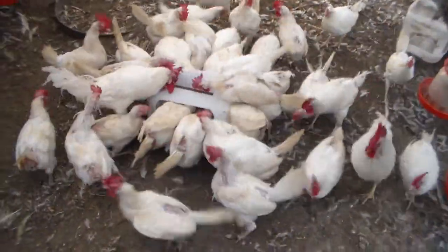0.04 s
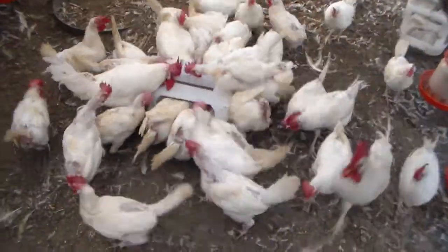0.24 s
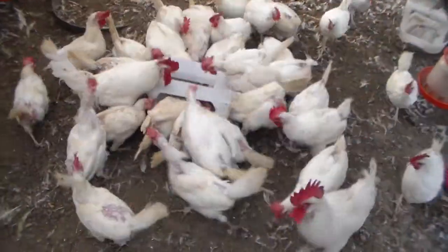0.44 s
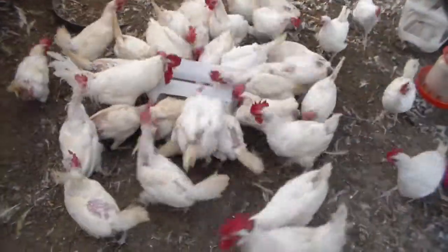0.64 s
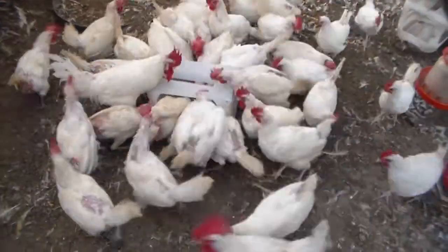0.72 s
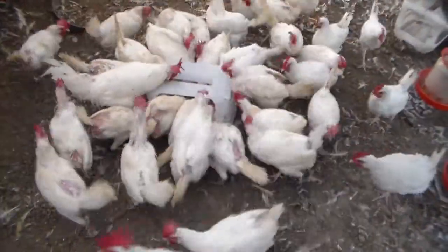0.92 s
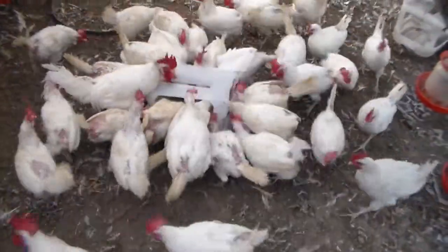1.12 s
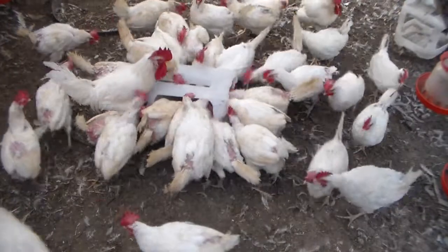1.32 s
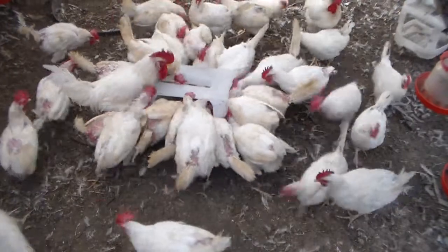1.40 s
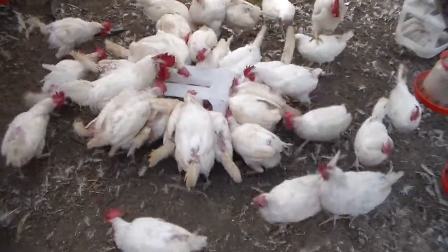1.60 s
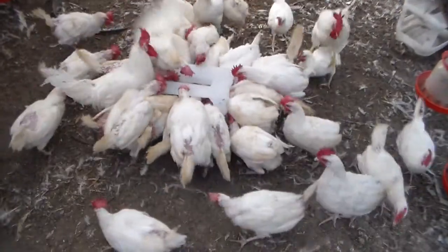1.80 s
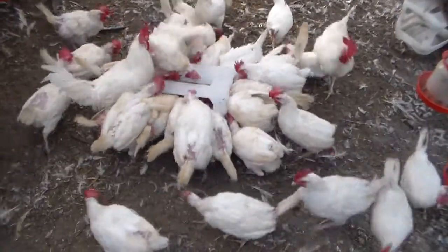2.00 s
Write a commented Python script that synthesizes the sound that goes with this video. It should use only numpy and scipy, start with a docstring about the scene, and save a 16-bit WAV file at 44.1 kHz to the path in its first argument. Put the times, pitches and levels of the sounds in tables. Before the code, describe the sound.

Hens call close up around a plastic feeder. A harsh, breathy squawk dies by 0.08 s, with short clucks to 0.3. Rough, wavering drawls overlap from 0.5 to 0.95, then scattered clucks until 1.5. A sharp call drops at 1.56; another drawl runs from 1.72, with high chirps at 1.8-1.95. Irregular beak ticks, soft wing thumps and swishes, litter rustle, distant flock murmur and low rumble continue throughout.

```python
"""Several hens squawk, drawl, chirp and cluck over one another, heard close up at a plastic feeder.
Their calls are stacks of wavering partials; one harsh squawk is pulses and breath through a throat.
Beaks tick on the ringing plastic; bodies and wings bump and brush as thumps, swishes and feather hiss.
Feet rustle in the litter as grains on noise; behind lie a farther flock, low yard rumble and wall echoes.
Two close microphones hear it, alike in the bass and unrelated in the treble."""
import sys
import numpy as np
from scipy import signal
from scipy.fft import rfft, irfft
from scipy.io import wavfile

SR = 44100
rng = np.random.default_rng(int(sys.argv[2]) if len(sys.argv) > 2 else 0)


def volts_from_db(level):
    """Convert decibel levels to linear amplitude ratios."""
    exponent = np.asarray(level, float) / 20
    return 10 ** exponent


def unload_wav(signal):
    """Save mono or channel-first audio to the path in sys.argv[1] as 16-bit WAV at rate SR, clipped to [-1, 1]."""
    wavfile.write(
        sys.argv[1],
        SR,
        np.round(np.clip(np.atleast_2d(signal).T, -1, 1) * 32767).astype(np.int16),
    )


N = 90493
T = np.arange(N) / SR  # seconds

# long calls: time_s, pitch_hz, first_partial_db, second_partial_db, third_partial_db
EARLY_DRAWL = [(.49, 565, -36, -27, -32), (.506, 590, -26, -18, -21), (.53, 585, -32, -23, -18),
               (.56, 560, -30, -27, -23), (.6, 505, -35, -26, -24)]
DRAWL = [(.595, 612, -31, -30, -29), (.63, 611, -25, -20.5, -33), (.7, 604.3, -25, -29.5, -38),
         (.77, 566.4, -20, -32, -28), (.8, 574, -17, -24, -39), (.84, 548.4, -21, -20.5, -24),
         (.88, 536.3, -41, -29, -24), (.91, 511.3, -55, -24.5, -38), (.94, 510, -33, -25, -43)]
HELD_DRAWL = [(.59, 658, -24, -26, -34), (.66, 650, -35, -22, -39), (.74, 644.3, -29, -23.5, -31.5),
              (.82, 633, -38, -31, -28.5), (.9, 632, -32, -35, -43)]
FALLING_CALL = [(1.558, 1005, -27, -41, -42), (1.57, 992, -10.5, -49, -62), (1.578, 939.6, -25, -33, -39),
                (1.588, 843, -23, -29, -48), (1.604, 793, -25, -35, -48), (1.61, 729, -12, -15, -53),
                (1.616, 647, -17.5, -14, -16.5), (1.634, 632.6, -25.5, -16, -38),
                (1.702, 680.7, -29, -60, -47), (1.72, 666, -43, -47, -45)]
LATE_DRAWL = [(1.72, 590, -25, -39, -34), (1.76, 584, -35, -26, -26.5), (1.8, 546.2, -27.5, -27, -22),
              (1.83, 551, -25.5, -37, -34), (1.86, 606.6, -30, -27, -34), (1.9, 609.4, -21, -25, -32),
              (1.925, 600, -22, -24, -36), (1.95, 564, -43, -24, -20.5), (1.99, 597, -37, -24, -36)]
CHIRP = [(1.795, 872, -37, -38, -48), (1.799, 900, -19, -38, -51), (1.802, 898, -11.5, -27, -51),
         (1.831, 1024, -7, -36, -34), (1.837, 1010, -16.5, -46, -44), (1.851, 1110, -11, -34, -52),
         (1.863, 1038, -24, -54, -62), (1.879, 1171, -21, -47, -57)]
SECOND_CHIRP = [(1.879, 1298, -10, -50, -68), (1.887, 1223, -7.5, -56, -65), (1.893, 1291, -8, -69, -63),
                (1.899, 1258, -7, -46, -57), (1.923, 1250, -13.5, -33, -40), (1.931, 1192, -15.5, -32, -42),
                (1.945, 1124, -23, -42, -16)]
# short clucks: start_s, length_s, start_pitch_hz, end_pitch_hz,
# first_partial_db, second_partial_db, third_partial_db
CLUCKS = [(0, .062, 820, 790, -38, -15, -36), (.002, 0.058, 719.5, 576, -28, -35, -29),
          (0.089, .022, 309.6, 300, -35, -23.5, -38), (0.181, 0.044, 432, 438.3, -63, -26, -38),
          (0.213, 0.028, 579, 559, -26.5, -20, -24.5), (0.265, 0.013, 442, 417, -28.5, -17.5, -28),
          (0.597, 0.022, 725, 680, -26, -21, -23.5), (0.62, 0.035, 908, 804, -31, -35, -28.5),
          (0.743, 0.094, 818, 796, -26, -41, -45), (.944, .014, 738, 749.2, -49, -4.5, -33),
          (.945, 0.016, 880, 883, -45, -14, -44), (0.959, .012, 742, 713, -30.5, -23, -32),
          (0.97, .022, 694.5, 678, -38, -18.5, -25.5), (0.996, .028, 790, 755.7, -25.5, -25.5, -54),
          (1.02, 0.036, 706, 658.5, -20.5, -19.5, -48), (1.101, .026, 432.2, 430, -55, -24, -26.5),
          (1.128, 0.036, 422.7, 439, -36.5, -35, -46), (1.22, .016, 670, 645, -15.5, -35, -15.5),
          (1.249, 0.046, 578.8, 553, -22, -18.5, -24), (1.326, 0.019, 719, 830.6, -30.5, -21.5, -56),
          (1.38, 0.023, 431.2, 428, -38, -27.5, -31.5), (1.472, 0.016, 573.5, 566, -16, -29, -30),
          (1.618, 0.029, 1034, 1231, -16.5, -38, -39), (1.667, 0.015, 829, 870, -28, -22.5, -39),
          (1.958, 0.017, 597, 580, -16.5, -30, -45)]
# harsh squawk, already dying: time_s, mean_pitch_hz, rms_db
SQUAWK = [(0, 257.5, -8), (.014, 261.6, -8.5), (0.03, 260.2, -11.5), (0.048, 248.5, -15.5),
          (0.065, 241, -23), (.08, 230, -55)]
# throat resonances of the squawk: centre_hz, first_pass_width_hz, relative_db
SQUAWK_THROAT = [(650, 350, -18), (1128, 270, 2.5), (1525, 540, 2.5), (2560, 250, 4), (3620, 960, -9.5),
                 (5130, 250, -13.5), (6860, 2000, -22)]
# beak on plastic: start_s, relative_tick_db, relative_ring_db, left_over_right_db
PECKS = [(0.06, -43, -21, -3), (0.2123, -16, -9, 5), (0.2668, -5.5, -11, 1.5), (0.3336, -19.5, -38, -1.0),
         (0.422, -37, -20.5, 0.5), (0.4572, -9, -7, 0.5), (0.7674, -33, -12, 2), (0.847, -31, -7.5, -1),
         (0.8715, -27, -20, -2), (0.9177, -20, -13, -1), (1.1397, -16.5, -43, -2), (1.221, -18, -6, 0.5),
         (1.445, -29, -30, -0.5), (1.5475, -6, -4.5, 1), (1.6898, -43, -21.5, 5), (1.8288, -46, -12, 5),
         (1.8841, -23, -40, 5), (1.94, -25, -30, 4)]
# ring modes of the feeder: mean_hz, relative_db, longest_t60_s (all are capped in pecks)
FEEDER_MODES = [(1967, 4, .03), (2520, 4.5, 0.018), (3000, 1, 0.027), (3304, -1, 0.023), (3746, 2, 0.027),
                (4630, -2.5, 0.012), (5300, -29, 0.014), (6600, -16, 0.014), (8000, -34, 0.011),
                (10200, -4, 0.02)]
# colour of a beak tick: frequency_hz, relative_db_per_hz
TICK_COLOUR = [(1200, -14), (2500, 2), (5000, 4.5), (9000, 1), (11000, -5.5), (15000, -8)]
# wings and bodies brushing: start_s, relative_thump_db, relative_swish_db, relative_hiss_db,
# thump_hz, swish_hz, rise_s
BUMPS = [(0.091, -23, -25, -37, 296, 580, 0.0068), (0.138, -31, -18, -23, 199, 537, 0.013),
         (0.217, -25, -14, -22.5, 378, 1110, 0.0073), (0.3, -24, -24.5, -39, 201, 1150, 0.0037),
         (0.448, -35, -19, -25, 313, 1940, 0.015), (0.506, -16, -7, -55, 346, 1170, 0.0049),
         (0.529, -26.5, -9, -25.5, 210.3, 1525, 0.015), (0.61, -46, -4.5, -38, 425, 2070, 0.0097),
         (0.683, -50, -38, -25.5, 281, 1240, 0.0051), (0.715, -6.5, -5.5, -53, 308, 566, 0.0057),
         (0.772, -18, -8.5, -50, 271, 553, 0.0049), (0.844, -4, -6, -27.5, 348.6, 1680, 0.0075),
         (0.871, -18, -12, -33, 311, 1090, 0.0048), (0.945, -46, -16, -30.5, 349.3, 1490, 0.0044),
         (1.015, -26, -20, -33, 108.3, 760, 0.0031), (1.1403, -40, -21, -54, 298, 1170, 0.0018),
         (1.192, -28, -18, -28, 348, 696, 0.0068), (1.22, -13, -10, -51, 359.8, 1966, 0.0059),
         (1.253, -12.5, -8, -30, 291, 569.3, 0.0049), (1.382, -38, -31, -33.5, 284.5, 867, 0.0049),
         (1.396, -34, -26.5, -59, 121, 870, 0.0094), (1.479, -18, -20.5, -41, 471.6, 554, 0.0028),
         (1.517, -12.5, -12.5, -19.5, 339.3, 1310, 0.0042), (1.571, -16.5, -13, -36, 251.3, 1034, 0.0057),
         (1.709, -20, -46, -37.5, 294, 586, 0.0055), (1.811, -10, -13.5, -32, 407, 1020, 0.0065),
         (1.919, -16, -8, -35, 331.5, 1201, 0.0058), (1.936, -53, -16.5, -24.5, 161.8, 1090, 0.0057),
         (1.957, -25, -5.5, -24, 285, 570, 0.013), (1.989, -7.5, -43, -23, 443, 1490, 0.016),
         (2.035, -13.5, -6.5, -29, 216, 1425, 0.0049)]
# colour of the swish: frequency_hz, relative_db_per_hz
SWISH_COLOUR = [(300, -11.5), (600, 4.5), (1200, 6.5), (2000, -5), (3000, -8.5), (4500, -26), (7000, -64)]
# colour of the feather hiss: frequency_hz, relative_db_per_hz
HISS_COLOUR = [(1500, 3.5), (3000, 2.5), (5000, -2.5), (8000, -8.5), (11000, -10.5), (15000, -36)]
# rustle of feet and feathers: time_s, relative_db
RUSTLE_LEVEL = [(0.0, -46), (0.14, -34), (0.24, -36.5), (0.55, -35.5), (0.7, -30.5), (0.84, -26),
                (0.95, -34.5), (1.23, -38), (2.05, -31)]
# colour of the litter: frequency_hz, relative_db_per_hz
LITTER_COLOUR = [(100, -26), (200, 13), (600, 4), (2000, 3), (3700, -0.5), (5800, -9.5), (9500, -11),
                 (12000, -11.5), (14200, -8), (15300, -50)]
# murmur of the farther flock: time_s, relative_db
MURMUR_LEVEL = [(0, -33), (.3, -35), (.45, -36), (.6, -29), (.9, -28), (1.05, -33), (1.35, -35), (1.5, -33),
                (1.7, -29), (2.05, -29)]
# colour of the murmur: frequency_hz, relative_db_per_hz
MURMUR_COLOUR = [(150, -4), (300, -7.5), (600, 3), (1200, 1), (1900, -2.5), (2800, -8), (4500, -23)]
# low rumble of the yard: frequency_hz, relative_db_per_hz
RUMBLE_COLOUR = [(12, -28), (20, 10.5), (76, -13), (193, 3), (242, -10), (319, -2), (400, -1.5), (520, -54),
                 (880, -120)]
# nearby walls: delay_s, level_db
ECHOES = [(.007, -52), (0.015, -19.5), (0.022, -15), (0.034, -26)]
# the microphone pair: frequency_hz, left_right_likeness (0 to 1)
LIKENESS = [(25, 0.57), (60, 0.92), (200, 1), (1000, 0.98), (2000, 0.88), (4000, 0.7), (8000, 0),
            (14000, 0.018)]


def voice(hz, dbs, rough, flutter_hz):
    """Partials of one moving pitch; the rough share flutters in level and phase and adds half lines."""
    higher_step_db, half_line_db = -9, -1.5
    throat_hz, throat_width_hz, throat_db = 4000, 900, -22
    rough = np.clip(rough, 0, 1)
    phase = 2 * np.pi * np.cumsum(hz) / SR
    # each line is (multiple of the pitch, level in dB)
    lines = [(k + 1, db) for k, db in enumerate(dbs)]
    lines += [(3 + k, dbs[2] + higher_step_db * k) for k in (1, 2, 3)]
    for k in (3.5, 6, 9.5, 7.4):  # upper lines weighted by a high throat resonance
        off_centre = (k * hz - throat_hz) / throat_width_hz
        lines.append((k, dbs[1] + throat_db - 10 * off_centre ** 2))
    rough_db = 20 * np.log10(rough + 1e-3)
    for k in (0, 1):  # uneven cycles add lines between the partials
        lines.append((k + 1.5, (dbs[k] + dbs[k + 1]) / 2 + half_line_db + rough_db))
    wobbles = [drift(flutter_hz) + 1j * drift(flutter_hz) for _ in range(3)]
    out = 0
    for j, (k, db) in enumerate(lines):
        share = rough ** (2 / max(k, 2))  # higher lines are rougher
        wobble = np.roll(wobbles[j % 3], j * SR // 7)
        flutter = np.sqrt(2 - 2 * share) + np.sqrt(share) * wobble
        out = out + volts_from_db(db) * (flutter * np.exp(1j * k * phase)).imag
    return out


def long_call(rows, rough, flutter_hz):
    """One drawn-out call: pitch and partial levels glide between the table's points."""
    s, *columns = np.transpose(rows)
    hz, *dbs = [np.interp(T, s, c) for c in columns]
    fade = np.clip(np.minimum(T - s[0], s[-1] - T) / 0.0038, 0, 1)
    return voice(hz, dbs, rough, flutter_hz) * fade


def clucks():
    """Short gliding notes with a quick rise and a rounded fall."""
    attack, release = 0.2, 0.37  # shares of the note's length
    out = 0
    for group in (CLUCKS[::2], CLUCKS[1::2]):  # two voices, so that neighbours may overlap
        hz, dbs, env = np.full(N, 500.), np.full((3, N), -90.), np.zeros(N)
        for s, length, start_hz, end_hz, *levels in group:
            u = (T - s) / length
            on = (u > 0) & (u < 1)
            hz[on] = start_hz + (end_hz - start_hz) * u[on]
            dbs[:, on] = np.array(levels)[:, None]
            ramp = np.minimum(u[on] / attack, (1 - u[on]) / release)
            env[on] = np.sin(np.pi / 2 * np.minimum(ramp, 1))
        out = out + env * voice(hz, dbs, rough=0.17, flutter_hz=86)
    return out


def squawk():
    """Jittered pulses with breathy noise through the throat, already ringing at the start."""
    breath = 0.32
    s, hz, db = np.transpose(SQUAWK)
    early = SR // 50  # samples of run-in
    jitter = 1 + 0.014 * drift(160)
    cycles = np.cumsum(np.interp(T - early / SR, s, hz) * jitter) / SR
    pulses = np.diff(np.floor(cycles), prepend=0) * 11 * (1 + 0.16 * rng.standard_normal(N))
    source = pulses + breath * rng.standard_normal(N) * (1 + np.cos(2 * np.pi * cycles))
    tone = 0
    for k, (f, width, gain_db) in enumerate(SQUAWK_THROAT):
        formant = resonate(resonate(source, f, width), f, 1.16 * width)
        tone = tone + (-1) ** k * volts_from_db(gain_db) * formant
    fade = np.clip((s[-1] - T) / 0.0079, 0, 1)
    return rms_one(np.roll(tone, -early)) * volts_from_db(np.interp(T, s, db)) * fade


def pecks():
    """Tick, rebound, brief ring of the plastic and a scatter of feed; distant beaks tick at random."""
    tick_db, tick_t60_s = 1.5, 0.006
    ring_gain_db, ring_cap_t60_s = -7.5, 0.022
    rebound_db, rebound_s = -1, 0.0045
    scatter_db, scatter_t60_s = -7.5, 0.086
    out = np.zeros((2, N))
    t = T[:SR // 10]
    lag = int(rebound_s * SR)
    hiss = np.array([coloured(TICK_COLOUR, rng.standard_normal(N)) for _ in range(2)])
    for s, db, ring_db, pan_db in PECKS:
        ring = 0
        for f, mode_db, t60 in FEEDER_MODES:  # each peck excites and detunes the modes by chance
            luck, detune = rng.standard_normal(2)
            level = volts_from_db(mode_db + ring_db + ring_gain_db + 2 * luck)
            decay = volts_from_db(-60 * t / min(t60, ring_cap_t60_s))
            ring = ring + level * decay * np.sin(2 * np.pi * f * (1 + 0.05 * detune) * t)
        i = int(s * SR)
        noise = volts_from_db(db) * hiss[:, i:i + len(t)]
        hit = ring + noise * volts_from_db(tick_db - 60 * t / tick_t60_s)
        rebound = volts_from_db(rebound_db) * np.pad(hit, ((0, 0), (lag, 0)))[:, :len(t)]
        scatter = noise * volts_from_db(scatter_db - 60 * t / scatter_t60_s)
        pan = volts_from_db([[pan_db / 2], [-pan_db / 2]])
        out[:, i:i + len(t)] += 0.5 * (hit + rebound + scatter) * pan
    # distant beaks: two streams of 150 ticks per second each, summed
    far = (rng.random((2, N)) < 150 / SR) * volts_from_db(-45 + 2.6 * rng.standard_normal((2, N)))
    far_decay = np.exp(-1 / (0.0069 * SR))
    return out + hiss * signal.lfilter([1], [1, -far_decay], far.sum(axis=0))


def bumps():
    """Each brush is a low thump, a swish and a feather hiss that rise together and die at own rates."""
    thump_gain_db, swish_gain_db, hiss_gain_db = 2.5, -2, 7
    thump_fall_cycles, swish_fall_s, hiss_fall_s = 2.2, 0.01, 0.012  # to 1/e
    thump_noise, swish_focus, swish_width = 0.43, 0.89, 0.18  # width as a share of swish_hz
    grain = volts_from_db(drift(223))  # feathers catch unevenly, spread 1 dB
    swish = coloured(SWISH_COLOUR, grain * rng.standard_normal(N))
    hiss = coloured(HISS_COLOUR, grain * rng.standard_normal(N))
    puff = rng.standard_normal(N)
    out = np.zeros(N)
    for s, thump_db, swish_db, hiss_db, hz, swish_hz, rise_s in BUMPS:
        near = slice(max(int(s * SR) - SR // 50, 0), int(s * SR) + SR // 8)
        t = np.maximum(T[near] - s, 0)
        rise = 2 - 2 * np.exp(-(t / max(rise_s, .001)) ** 2)
        soft = rms_one(resonate(resonate(puff[near], hz, hz), hz, hz))
        body = np.sin(2 * np.pi * hz * t) + thump_noise * soft
        focus = rms_one(resonate(puff[near], swish_hz, swish_width * swish_hz))
        air = rms_one(swish[near] + swish_focus * focus)
        brush = volts_from_db(thump_db + thump_gain_db) * np.exp(-t * hz / thump_fall_cycles) * body
        brush += volts_from_db(swish_db + swish_gain_db) * np.exp(-t / swish_fall_s) * air
        brush += volts_from_db(hiss_db + hiss_gain_db) * np.exp(-t / hiss_fall_s) * hiss[near]
        out[near] += rise * brush
    return out


def litter_rustle(swell, dense):
    """Feet in the litter: dry random grains, now denser and now thinner, on soft swelling noise."""
    grains = (rng.random(N) < 390 / SR * dense) * rng.standard_normal(N)  # about 390 per second
    source = rng.standard_normal(N) * swell + volts_from_db(-8) * rms_one(grains)
    level = volts_from_db(np.interp(T, *np.transpose(RUSTLE_LEVEL)) + 2)
    return level * coloured(LITTER_COLOUR, source)


def far_flock(swell):
    """The farther flock blurs into a murmur of swelling coloured noise."""
    level = volts_from_db(np.interp(T, *np.transpose(MURMUR_LEVEL)))
    return level * swell * coloured(MURMUR_COLOUR, rng.standard_normal(N))


def yard_rumble():
    """Steady low noise of the open yard."""
    return volts_from_db(-40.5) * coloured(RUMBLE_COLOUR, rng.standard_normal(N))


def background():
    """Litter, far flock and rumble, drawn afresh for mid and side under shared swells."""
    dense, swell = volts_from_db(1.9 * drift(42)), volts_from_db(2.0 * drift(31))
    mid, side = [litter_rustle(swell, dense) + far_flock(swell) + yard_rumble() for _ in range(2)]
    return blend(mid, side)


def wall_echoes(x):
    """A few dull, delayed copies from nearby walls."""
    dull = signal.sosfilt(signal.butter(1, 3000, fs=SR, output="sos"), x)
    return sum(volts_from_db(db) * np.interp(T - s, T, dull, left=0) for s, db in ECHOES)


def blend(mid, side):
    """Two close microphones: alike in the bass, unrelated in the treble."""
    hz = np.maximum(np.fft.rfftfreq(N, 1 / SR), 1)
    alike = np.clip(at_hz(LIKENESS, hz), 0, 1)
    mid = irfft(rfft(mid) * np.sqrt(1 + alike), N)
    side = irfft(rfft(side) * np.sqrt(1 - alike), N)
    return np.array([mid + side, mid - side]) / np.sqrt(2)


def widen(x):
    """A single source reaches the side smeared in phase by scattering."""
    smear = rng.standard_normal(SR // 50) * np.exp(-T[:SR // 50] / .003)
    turn = np.exp(1j * np.angle(rfft(smear, N)))
    return blend(x, irfft(rfft(x) * turn, N))


def rms_one(x):
    """Scale to rms 1."""
    return x / np.sqrt(np.mean(x ** 2) + 1e-20)


def at_hz(points, hz):
    """Read a spectrum table along log frequency."""
    table_hz, value = np.array(points).T
    return np.interp(np.log(hz), np.log(table_hz), value)


def drift(rate_hz):
    """Slow random wander of rms 1: noise through two equal low-pass poles."""
    r = np.exp(-2 * np.pi * rate_hz / SR)
    wander = signal.lfilter([1], [1, -2 * r, r * r], rng.standard_normal(N + SR))
    return rms_one(wander[SR:])


def resonate(x, hz, width_hz):
    """Two-pole resonance of gain 1 at its centre."""
    r = np.exp(-np.pi * width_hz / SR)
    poles = [1, -2 * r * np.cos(2 * np.pi * hz / SR), r * r]
    return signal.lfilter([(1 - r * r) / 2, 0, (r * r - 1) / 2], poles, x + 1e-18)


def coloured(spectrum, source):
    """Shape a noise or grain stream by a spectrum; rms 1."""
    hz = np.maximum(np.fft.rfftfreq(N, 1 / SR), 1)
    return rms_one(irfft(rfft(source) * volts_from_db(at_hz(spectrum, hz)), N))


def scene():
    """Hens, feeder, brushing bodies and yard together at the microphones."""
    hens = clucks() + squawk()
    hens += long_call(EARLY_DRAWL, rough=0.89, flutter_hz=71)
    hens += long_call(DRAWL, rough=0.4, flutter_hz=47.8)
    hens += long_call(HELD_DRAWL, rough=0.4, flutter_hz=40.4)
    hens += long_call(FALLING_CALL, rough=0.18, flutter_hz=63.0)
    hens += long_call(LATE_DRAWL, rough=0.67, flutter_hz=64.0)
    hens += long_call(CHIRP, rough=0.039, flutter_hz=49.0)
    hens += long_call(SECOND_CHIRP, rough=0.12, flutter_hz=51.0)
    near, ticks = hens + bumps(), pecks()
    echoes = wall_echoes(near + ticks.mean(axis=0))
    return widen(near + echoes) + ticks + background()


def band_limit(x):
    """A steep low-pass at the top of the band."""
    return signal.sosfilt(signal.butter(12, 15430, fs=SR, output="sos"), x)


def record(dry):
    """Peaks are rounded softly and the top is cut, 50 dB down from 15.1 kHz."""
    rounded = 1.071 * np.tanh(dry / 1.11)
    top_cut = signal.cheby2(10, 50, 15100, fs=SR, output="sos")
    mix = signal.sosfilt(top_cut, rounded)
    return band_limit(mix)


dry = scene()
out = record(dry)
unload_wav(out)
```